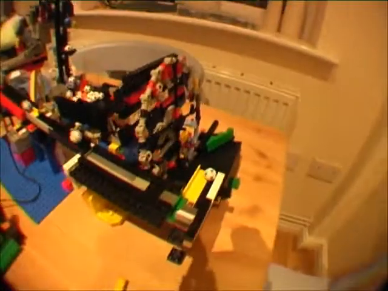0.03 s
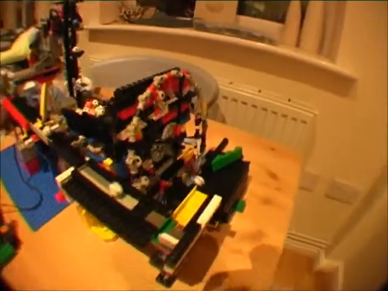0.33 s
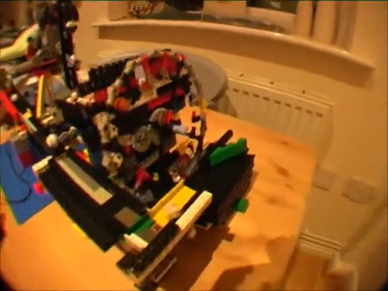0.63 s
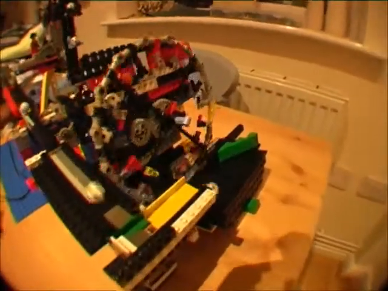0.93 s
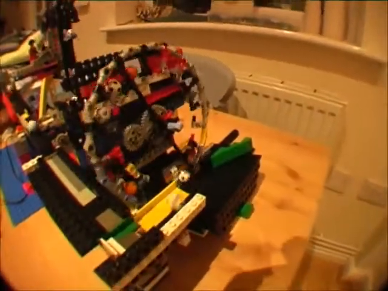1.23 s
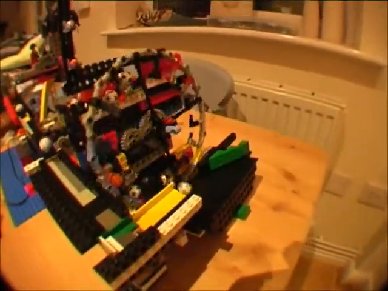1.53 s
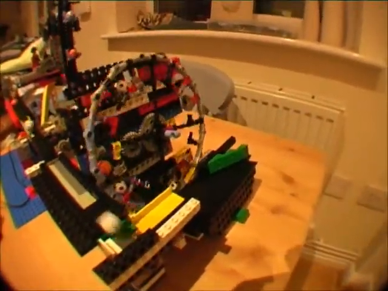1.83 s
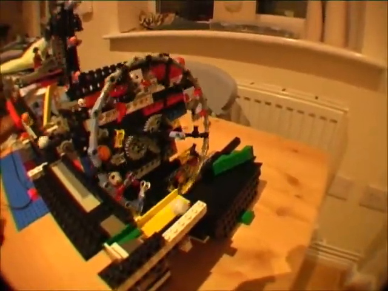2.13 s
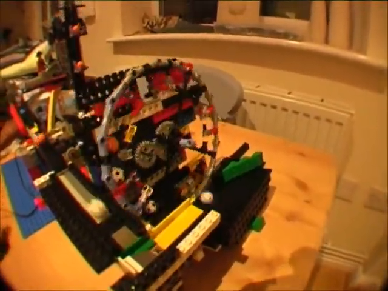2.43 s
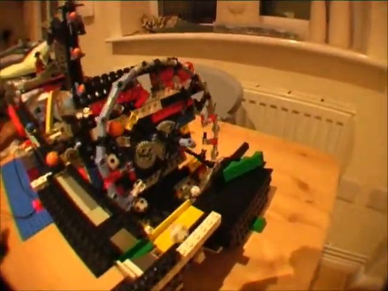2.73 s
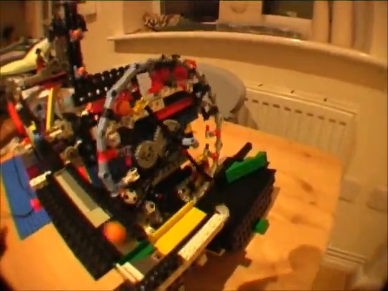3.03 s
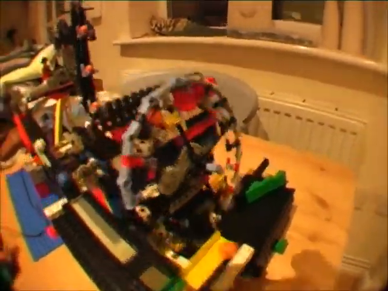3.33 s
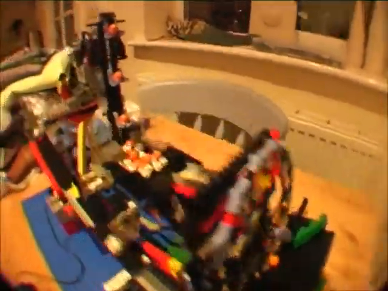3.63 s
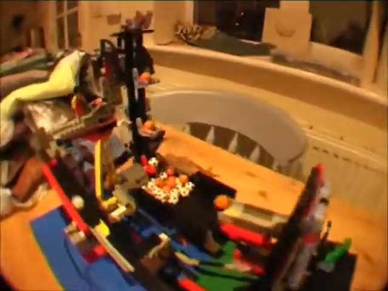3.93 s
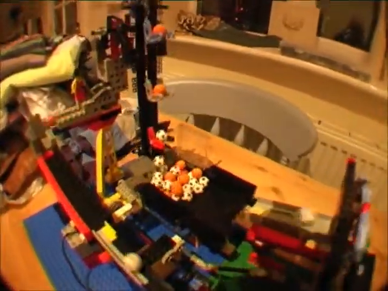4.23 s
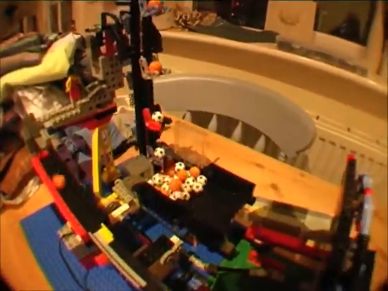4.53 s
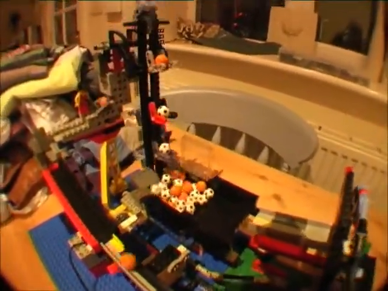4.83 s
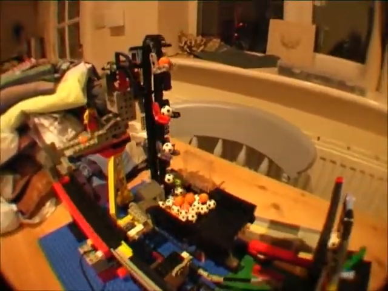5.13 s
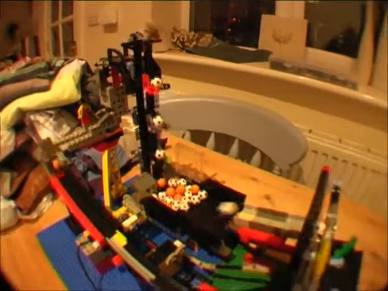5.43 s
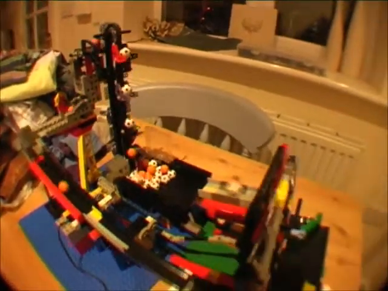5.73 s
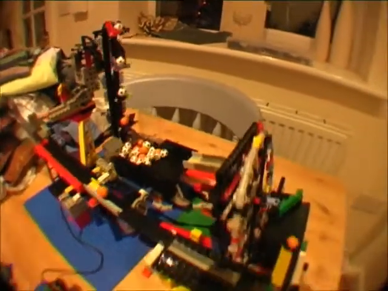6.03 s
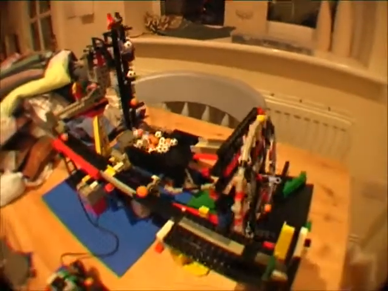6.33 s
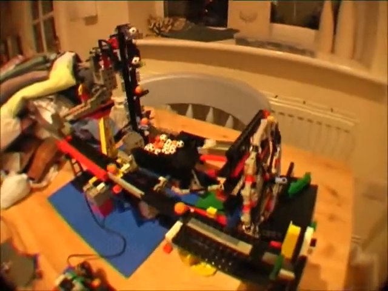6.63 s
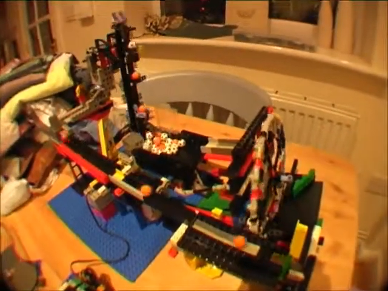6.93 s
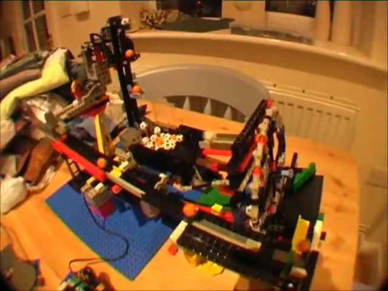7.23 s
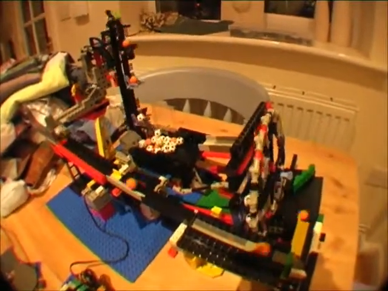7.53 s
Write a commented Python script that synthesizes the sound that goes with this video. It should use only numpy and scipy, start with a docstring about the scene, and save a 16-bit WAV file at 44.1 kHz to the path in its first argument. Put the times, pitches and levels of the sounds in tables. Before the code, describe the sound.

Small hard balls clatter and roll through a plastic brick machine, with clicking levers over a steady motor whir.

```python
"""Small hard balls clatter round a motor-driven machine of plastic bricks on a wooden table in a room.
Each impact excites damped modes: balls drop into a hollow chute, knock on brickwork, hop along ramps
and clink together, while levers snap. Rolling balls and loose parts merge many tiny contacts into a rattle.
The heavier blows thump the table, the room adds an echo and a short reverberant tail,
and the geared motor hums and whirs underneath."""
import sys
import numpy as np
from scipy import signal
from scipy.fft import rfft, irfft
from scipy.io import wavfile
from scipy.ndimage import uniform_filter1d

SR = 44100
rng = np.random.default_rng(int(sys.argv[2]) if len(sys.argv) > 2 else 0)


def transcribe(signal):
    """Save signal, clipped to [-1, 1], as a 16-bit WAV file at the path in sys.argv[1]."""
    frames = np.atleast_2d(signal).T
    limited = np.clip(frames, -1, 1)
    pcm = np.round(limited * 32767).astype(np.int16)
    wavfile.write(sys.argv[1], SR, pcm)


N = 334278
TIME = np.arange(N) / SR
RING_TIME = np.arange(int(.06 * SR)) / SR

# Balls dropping into the chute: start_s, level_db, chute_db, pan_db (always left minus right)
DROPS = [(0.2793, -19, -23, -1), (0.9941, -21, -22, 1), (1.5329, -19, -21.5, -1), (2.4125, -21, -25, -1),
         (3.1199, -18.5, -23, 0), (3.5663, -20.5, -21.5, -1.5), (4.2741, -24.5, -22.5, -5),
         (4.5968, -26.5, -25.5, -8), (5.465, -21.5, -21.5, -2), (6.1743, -23, -22.5, -5)]
# Balls falling on hollow brickwork: start_s, level_db, hardness_db, pitch_hz, thump_db, pan_db
KNOCKS = [(0.3381, -18.5, -0.5, 1590, -40, 0.5), (1.0413, -18, -6, 1640, -55, 4.5),
          (1.221, -19.5, -6, 1610, -42, 6.5), (1.8787, -15, -5, 1550, -36, 3),
          (2.1583, -17.5, -2.5, 1575, -33, 5), (2.6458, -14.5, -8, 1564, -36, 2.5),
          (3.8948, -20, -3, 1400, -37, -1), (4.0768, -11, -6.5, 1560, -26.5, -2),
          (4.5264, -13.5, -4, 1645, -35, 0), (5.5774, -14, -7, 1580, -36, 2),
          (5.9692, -14, -5, 1577, -34, 3), (6.6474, -43.5, 19, 1570, -36, 0),
          (6.8392, -14.5, -3, 1600, -44, -1.5), (7.4256, -14, -4, 1610, -33, 0)]
# Balls hopping on ramps: start_s, level_db, hardness_db, pitch_hz, pan_db
TAPS = [(0.0665, -22, -1, 1440, 6), (0.9457, -19, -2, 1880, 4), (1.082, -20, -1, 1336, 1),
        (1.363, -24.5, 1.5, 2250, 3), (1.9742, -18, -6, 1730, 2), (2.6867, -22.5, 3, 1315, 0),
        (3.6463, -20.5, -1, 2170, -1), (3.9735, -17, -4, 1620, 0), (4.0651, -23, -3, 1760, -5),
        (4.1196, -21, 4, 1390, 0.5), (4.2613, -18.5, 0, 1360, 0), (4.579, -15, 0, 1456, 2),
        (4.7477, -18.5, 2.5, 1650, 1), (4.9393, -20, 2, 2050, -1), (5.0153, -20.5, 2, 2130, 0),
        (5.0656, -21.5, 0, 1740, 0), (5.399, -21.5, -10, 1600, 1), (5.563, -22, 0, 1770, 2),
        (5.6817, -18.5, -3, 2010, 0), (5.7071, -17, 4, 1277, 2), (6.044, -20, -10, 1380, 2),
        (6.0847, -17.5, -5, 1325, 0), (6.1082, -38, -30, 1330, 1), (6.123, -29, 0, 1360, 1),
        (6.1331, -19, -12, 1320, 2), (6.399, -18.5, 2.5, 1470, 0), (6.9583, -24.5, 4, 1670, 0),
        (6.9805, -19.5, 0, 1720, 1), (7.0261, -23.5, 7, 2220, 3), (7.1581, -20.5, 6, 2010, 0),
        (7.2171, -19, 6.5, 1280, 0), (7.532, -16, -2, 1300, 0.5), (7.5732, -19.5, -3, 1420, 3)]
# Balls striking each other: start_s, level_db, upper_mode_db (relative to the lower), pan_db
CLINKS = [(0.222, -17.5, 0, 8), (0.8457, -16.5, 8, 0), (1.0328, -16, 16, 1), (1.4472, -15.5, 5, 3.5),
          (1.4583, -18.5, 6, 2), (2.0335, -15.5, 0, 5), (2.754, -19, 2, 4), (2.842, -16.5, -9, 3),
          (3.6198, -21, -9, 7), (4.4076, -12, -1, 3), (4.5149, -15.5, -6, 4), (5.1874, -15, -3, 5),
          (5.1945, -11.5, -7, -1), (5.9312, -16, -5, 7), (5.9524, -22, -12, 0.5), (6.646, -17, -1, 4),
          (6.7845, -16, 3, 1), (7.2726, -17.5, -3, 8)]
# Levers and catches striking the frame: start_s, level_db, brightness_db, pitch_hz, pan_db
SNAPS = [(0.238, -16, 1.5, 3360, -1), (0.6235, -18, -5, 4600, 2), (0.664, -23, 8, 3700, 4),
         (0.779, -21, -8, 3670, 3), (0.7852, -16, 2, 4300, 3), (0.8459, -16, -8.5, 5000, 3.5),
         (1.5157, -21, -3, 4370, 8), (1.6097, -20, 2, 7230, 8), (1.6439, -22, -1.5, 3730, 3),
         (2.213, -22, -4, 5000, 3), (2.2942, -21, -6, 4300, 4), (2.3202, -27, -3, 5870, 10),
         (2.33, -19.5, 4, 3420, 2), (2.5757, -29.5, 12.5, 7540, 4), (2.778, -21.5, -6, 4840, 4),
         (2.9062, -20, -0.5, 3310, 3), (2.9478, -22, -4, 7200, 6), (3.0466, -14.5, 1, 4300, 4),
         (3.2849, -19.5, 3, 3220, 3), (3.4046, -31.5, 15, 3580, 10), (3.5435, -14.5, -1, 3310, 2),
         (3.7572, -17, 1.5, 4450, 3), (3.8083, -18, -4.5, 3320, 2), (3.8298, -20, 6, 2490, 2),
         (3.869, -19, 7, 4380, 1), (4.191, -27, 1, 7800, 0), (4.21, -20.5, 8.5, 3320, 3),
         (4.2147, -19.5, -6, 3280, -3), (4.8115, -20, 0, 3260, -1), (4.962, -25, 13, 3340, 3),
         (5.0824, -15.5, -1, 3150, 1), (5.1706, -18, -3, 3280, 1), (5.3303, -16, 2, 3760, 2),
         (5.443, -14.5, -1, 5850, 0), (6.1092, -19.5, -2, 7040, 3), (5.296, -25, 3, 3750, 2),
         (5.8327, -24, -10, 3750, 3), (6.165, -21, -9, 4270, 1), (6.3062, -22.5, -4, 4370, 4),
         (6.3735, -20.5, 1, 4440, 5), (6.5107, -20, 4.5, 4170, -1), (7.0075, -23, 3.5, 7400, 0),
         (7.0822, -22, 8, 4630, 0), (7.0735, -21, 8, 5100, 2), (7.129, -22, -3, 4070, -0.5),
         (7.2622, -18.5, 6, 3620, 3), (7.3692, -16.5, 4, 3320, 0), (7.382, -19.5, 3, 3800, 3)]

# Band balance of each kind of impact: body_db, click_db, crack_db
DROP_BANDS_DB = [3, 2, 3]
BOUNCE_BANDS_DB = [-2, -6.5, -12.5]
KNOCK_BANDS_DB = [-10.5, 1.5, 0]
TAP_BANDS_DB = [-6.5, -3.5, -9]
SNAP_BANDS_DB = [-10, -3, -10.5]
CLINK_BANDS_DB = [-20.5, -6.5, -12]
BODY_TOP_HZ, CLICK_TOP_HZ = 2500, 6000
# Radiation spectra of the brickwork and of the small rattling parts: frequency_hz, gain_db
BRICK_SPECTRUM = [(300, -19.5), (700, -25), (1000, -10), (1300, -1.5), (1700, -2.5), (2200, -2.5),
                  (2800, -7), (3800, -3.5), (5000, -4.5), (6300, -2.5), (7500, 5), (9000, -0.5),
                  (13000, -3), (16000, -23)]
RATTLE_SPECTRUM = [(300, -21), (750, -14), (1000, -9), (1300, 3), (1700, 2.5), (2200, 1.5), (2800, -1),
                   (3800, 1), (5000, -1.5), (7500, -2.5), (9000, -8), (13000, -15), (16000, -47)]

# Continuous activity of the machine: time_s, rolling_db, rattling_db
BUSTLE = [(0, -31.5, -28), (0.97, -34.5, -31), (1.251, -32, -29.5), (1.33, -38, -35), (1.72, -30, -26.5),
          (2.43, -33, -29), (2.56, -38, -41), (2.7, -30, -29.5), (3.42, -33.5, -31), (3.49, -46, -39),
          (3.56, -32, -29), (4.6, -30.5, -29.5), (4.88, -30.5, -32.5), (5.13, -29, -32.5), (5.3, -43, -29),
          (5.36, -31.5, -28.5), (6.3, -34.5, -29.5), (7.57, -37, -27)]
# Balance of that bustle as the listener moves from the wheel to the hopper: time_s, pan_db
BUSTLE_PAN = [(0, 3.5), (2.8, 2), (4, 1), (5.3, 0), (7.5, 1)]
# Balls running down ramps: start_s, length_s, midway_level_db
ROLLS = [(0.04, .11, -27), (0.45, .08, -32), (0.77, 0.11, -27.5), (1.16, 0.064, -28), (1.59, 0.11, -29.5),
         (2.28, .14, -25.5), (3.01, 0.089, -26), (3.19, 0.048, -27.5), (3.87, .14, -25.5),
         (4.31, .07, -24.5), (4.56, .11, -27), (4.74, .05, -27), (4.93, .06, -26.5), (5.02, 0.098, -24),
         (5.88, .07, -29), (6.1, 0.11, -36), (6.405, .08, -22), (6.5, 0.063, -30), (6.95, .07, -25.5),
         (7.07, 0.1, -25.5), (7.23, .06, -27)]
# Brief chatter of loose gears and levers: start_s, length_s, level_db
CHATTERS = [(0.6, 0.1, -31.5), (0.79, .07, -41), (1.63, 0.057, -26.5), (2.92, 0.03, -23),
            (3.6, 0.036, -20.5), (3.8, .05, -20.5), (4.41, .08, -27), (4.93, 0.033, -24), (5.41, 0.16, -26),
            (5.72, 0.03, -26), (6.69, 0.073, -29.5), (6.88, 0.053, -24), (7.455, 0.015, -24.5)]
# Resonances of the ramps, and of the levers and gears: pitch_hz
RAMP_HZ = [1297, 1485, 1470, 1696, 1865, 2144]
LEVER_HZ = [3328, 3757, 4463, 5010, 5754]

# Hum of motor and gearbox before the load gain: pitch_hz, level_db, width_hz
HUM_PARTIALS = [(162.7, -65, 4.3), (332.4, -58, 19)]
# How hard the motor works: time_s, hum_gain_db
MOTOR_LOAD = [(0, 6.5), (1, 6), (3, 7), (4.3, 4), (6, 1), (7.5, 9)]
# Gear whir and room noise: frequency_hz, gain_db
WHIR_SPECTRUM = [(20, -35), (60, -3), (130, -5), (350, 0), (580, -2.5), (900, 1), (1500, 4.5), (2800, 0.5),
                 (4000, 1.5), (7500, -6.5), (15000, -19)]
# Phase between the two listening points: frequency_hz, left_lead_rad
STEREO_PHASE = [(0, 0), (260, -0.6), (780, -0.7), (2500, -0.3), (3010, -0.3), (6030, 0.0), (13700, 0.0),
                (16000, -0.1)]


def chute():
    """Inelastic rebound: a ball sounds the hollow chute and bounces twice, sooner and softer each time."""
    out = np.zeros((2, N))
    first_flight_s, second_flight_s = .061, .027
    chute_modes = part_ring(874.6, t60=.06) + from_db(-7.5) * part_ring(1077, t60=.097)
    landings, bounces = contacts(len(DROPS)), contacts(len(DROPS))
    for (start_s, level_db, chute_db, pan_db), first, second in zip(DROPS, landings, bounces):
        landing = blow(first, DROP_BANDS_DB) + from_db(-1) * part_ring(1640, t60=.094)
        bounce = blow(second, BOUNCE_BANDS_DB) + from_db(-12) * part_ring(2060, t60=.094)
        tock = from_db(chute_db) * chute_modes * panned(-1)
        gain = from_db(level_db) * panned(pan_db)
        rebound = gain * bounce + from_db(-8.5) * tock
        add(out, start_s, gain * landing + tock)
        add(out, start_s + first_flight_s, rebound)
        add(out, start_s + first_flight_s + second_flight_s, from_db(-11) * rebound)
    return out


def knocks():
    """Resonance: a falling ball draws one strong note from hollow brickwork, thickened by a nearby mode."""
    out = np.zeros((2, N))
    for (start_s, level_db, hardness_db, pitch_hz, _, pan_db), bands in zip(KNOCKS, contacts(len(KNOCKS))):
        note = part_ring(pitch_hz, t60=.027) - from_db(-6.5) * part_ring(1.3 * pitch_hz, t60=.027)
        knock = blow(bands, KNOCK_BANDS_DB, hardness_db) + from_db(-.5) * blow_one(note)
        add(out, start_s, from_db(level_db) * knock * panned(pan_db))
    return out


def taps():
    """Impulse response: a hopping ball sounds the natural frequency of the ramp under it."""
    out = np.zeros((2, N))
    for (start_s, level_db, hardness_db, pitch_hz, pan_db), bands in zip(TAPS, contacts(len(TAPS))):
        tap = blow(bands, TAP_BANDS_DB, hardness_db) + from_db(-2.5) * part_ring(pitch_hz, t60=.05)
        add(out, start_s, from_db(level_db) * tap * panned(pan_db))
    return out


def clinks():
    """Hard collision: ball meets ball with hardly any body, and a pair of high modes pings."""
    out = np.zeros((2, N))
    lower, upper = part_ring(3703, t60=.033), part_ring(5040, t60=.033)
    for (start_s, level_db, upper_mode_db, pan_db), bands in zip(CLINKS, contacts(len(CLINKS))):
        ping = blow_one(lower + from_db(upper_mode_db) * upper)
        clink = blow(bands, CLINK_BANDS_DB) + from_db(-3) * ping
        add(out, start_s, from_db(level_db) * clink * panned(pan_db))
    return out


def snaps():
    """Free vibration: a lever strikes the frame and rings briefly; brightness trades body for crack."""
    out = np.zeros((2, N))
    for (start_s, level_db, brightness_db, pitch_hz, pan_db), bands in zip(SNAPS, contacts(len(SNAPS))):
        click = from_db(-brightness_db) * blow(bands, SNAP_BANDS_DB, 2 * brightness_db)
        ring = from_db(-6) * part_ring(pitch_hz, t60=.042)
        add(out, start_s, from_db(level_db) * (click + ring) * panned(pan_db))
    return out


def contacts(count):
    """Damping rises with frequency: each impact has a woody body, a shorter click and a brief crack."""
    body = crowded_modes(BRICK_SPECTRUM, t60=.017, snap_db=2, tail_db=-11, side_db=-16, count=count)
    click = crowded_modes(BRICK_SPECTRUM, t60=.015, snap_db=0, tail_db=-12, side_db=-15, count=count)
    crack = crowded_modes(BRICK_SPECTRUM, t60=.012, snap_db=4, tail_db=-10, side_db=-16, count=count)
    body = cut(body, BODY_TOP_HZ, "low")
    click = cut(click, [BODY_TOP_HZ, CLICK_TOP_HZ], "band")
    crack = cut(crack, CLICK_TOP_HZ, "high")
    return [[blow_one(band) for band in bands] for bands in zip(body, click, crack)]


def blow(bands, bands_db, hardness_db=0):
    """Contact stiffness: a harder impact lifts the crack, and the click by half as many decibels."""
    return sum(from_db(band_db + share * hardness_db) * band
               for band, band_db, share in zip(bands, bands_db, (0, .5, 1)))


def crowded_modes(spectrum, t60, snap_db, tail_db, side_db, count):
    """Modal overlap: a brick's modes blur into noise with a snap, a fast decay and the frame's tail."""
    decay = from_db(snap_db) * fade(.0025) + fade(t60) + from_db(tail_db) * fade(.05)
    return colour(stereo_noise((count, len(RING_TIME)), side_db) * decay, spectrum)


def part_ring(hz, t60):
    """Radiation efficiency: a small ringing part radiates poorly below its own note."""
    return blow_one(cut(mode(hz, t60), .6 * hz, "high", order=2))


def table():
    """Structure-borne sound: the table top answers a blow with a damped thump and a slow sway."""
    out = np.zeros((2, N))
    thump = blow_one(mode(170, t60=.025) + from_db(6) * mode(340, t60=.015))
    sway = blow_one(mode(38.5, t60=.059))
    # start_s, level_db, sway_db; a drop rocks the table more
    blows = [(start_s, thump_db, -7.5) for start_s, _, _, _, thump_db, _ in KNOCKS]
    blows += [(start_s, level_db - 32, 8.5) for start_s, level_db, *_ in DROPS]
    blows += [(start_s, level_db - 27.5, -7.5) for start_s, level_db, *_ in CLINKS]
    for start_s, level_db, sway_db in blows:
        add(out, start_s, from_db(level_db - .5) * (thump + from_db(sway_db) * sway))
    return out


def bustle():
    """Roughness excitation: balls roll over studs and seams, while gears and levers chatter higher up."""
    time_s, rolling_db, rattling_db = np.transpose(BUSTLE)
    runs = swells(ROLLS, gain_db_per_s=9)   # a ball grows louder as it gathers speed
    treble_bursts = np.hypot(swells(CHATTERS), from_db(-3) * runs)
    rolling_gain = np.hypot(from_db(np.interp(TIME, time_s, rolling_db)), runs)
    rattling_gain = np.hypot(from_db(np.interp(TIME, time_s, rattling_db)), treble_bursts)
    speed = rolling_gain / rolling_gain.mean()   # faster balls cross more seams
    rolling = rattle(RAMP_HZ, ring_db=-5, per_s=460 * speed ** 1.7)
    levers = rattle(LEVER_HZ, ring_db=-4.5, per_s=320 * speed ** .7)
    low = cut(levers + from_db(1) * rolling, BODY_TOP_HZ, "low")
    low = cut(low, 169, "high", order=2)   # small parts radiate no bass
    high = cut(levers + from_db(-7.5) * rolling, BODY_TOP_HZ, "high")
    return rolling_gain * evened(low, .04) + rattling_gain * evened(high, .1)


def rattle(rings_hz, ring_db, per_s, spread_db=4.5, count=180):
    """Shot noise: random small contacts of uneven strength, each on a part of its own size and place."""
    out = np.zeros((2, N))
    parts = crowded_modes(RATTLE_SPECTRUM, t60=.023, snap_db=-1, tail_db=-16, side_db=-13, count=count)
    slots = 12000
    for when, chance, size, which, detune, place in rng.random((slots, 6)):
        if chance < per_s[int(when * N)] * N / SR / slots:
            part = int(which * count)
            pitch_hz = rings_hz[part % len(rings_hz)] * (1 + .08 * (detune - .5))
            contact = blow_one(parts[part]) + from_db(ring_db) * blow_one(mode(pitch_hz, t60=.03))
            strength = from_db(spread_db * min(-np.log(1 - size), 3.2))
            add(out, when * N / SR, strength * contact * panned(6 * (place - .5)))
    return out


def swells(rows, gain_db_per_s=0, attack_s=.014, release_s=.02):
    """Incoherent sources add in power: the joint envelope of sounds that set in, last and die away."""
    t, power = TIME[::40], 0
    for start_s, length_s, level_db in rows:
        age = t - start_s
        gate = np.clip(age / attack_s, 0, 1) * np.exp(-np.maximum(age - length_s, 0) / release_s)
        growth_db = gain_db_per_s * (np.clip(age, 0, length_s) - length_s / 2)
        power = power + (gate * from_db(level_db + growth_db)) ** 2
    return np.interp(TIME, t, np.sqrt(power))


def motor():
    """Narrowband noise: the motor's hum wavers and follows its load, over the steady whir of the gears."""
    hum = 0
    for pitch_hz, level_db, width_hz in HUM_PARTIALS:
        pole = np.exp(-2 * np.pi * width_hz / SR)
        noise = rng.standard_normal(N) + 1j * rng.standard_normal(N)
        waver = signal.lfilter([1], [1, -2 * pole, pole * pole], noise)
        hum = hum + from_db(level_db) * rms_one(np.real(waver * np.exp(2j * np.pi * pitch_hz * TIME)))
    whir = from_db(-36) * rms_one(colour(stereo_noise((N,), side_db=-13), WHIR_SPECTRUM))
    load_gain = from_db(np.interp(TIME, *np.transpose(MOTOR_LOAD)))
    return whir + hum * load_gain * panned(-1.4)


def room(x, echo_s, echo_db, tail_db, t60):
    """Reflection: a near wall returns one dull echo, and the furnished room adds a short diffuse tail."""
    t = np.arange(SR // 2) / SR
    tail = cut(rng.standard_normal((2, len(t))), 4700, "low", order=1)
    tail = tail * from_db(-60 * t / t60) * (t > echo_s)
    tail = from_db(tail_db) * tail / np.sqrt(np.sum(tail ** 2) / 2)
    echo = np.zeros((2, N))
    add(echo, echo_s, from_db(echo_db) * cut(x, 2300, "low", order=1))
    return x + echo + signal.fftconvolve(x, tail, axes=-1)[:, :N]


def mode(hz, t60):
    """Damped harmonic oscillator."""
    return np.sin(2 * np.pi * hz * RING_TIME) * fade(t60)


def fade(t60):
    """Exponential decay by 60 dB in t60 seconds."""
    return from_db(-60 * RING_TIME / t60)


def stereo_noise(shape, side_db):
    """Partial coherence: noise mostly common to both ears; channels are the last axis but one."""
    mid, side = rng.standard_normal((2,) + shape)
    return np.stack([mid + from_db(side_db) * side, mid - from_db(side_db) * side], axis=-2)


def colour(x, spectrum, size=4096):
    """Minimum-phase filter through the points of a spectrum."""
    hz, level_db = np.transpose(spectrum)
    bins_hz = np.arange(size // 2 + 1) * SR / size
    gain = from_db(np.interp(np.log(bins_hz + 1), np.log(hz), level_db))
    cepstrum = irfft(np.log(gain))
    cepstrum[1:size // 2] *= 2   # folding onto positive time makes the response causal
    cepstrum[size // 2 + 1:] = 0
    response = irfft(np.exp(rfft(cepstrum)))[:size // 2]
    response = response.reshape((1,) * (x.ndim - 1) + (-1,))
    return signal.fftconvolve(x, response, axes=-1)[..., :x.shape[-1]]


def cut(x, hz, kind, order=4):
    return signal.sosfilt(signal.butter(order, hz, kind, fs=SR, output="sos"), x)


def evened(x, seconds):
    """Division by the running rms holds the slow level at 1 and keeps the single contacts."""
    power, width = np.mean(x ** 2, axis=0), int(seconds * SR)
    return x / np.sqrt(uniform_filter1d(uniform_filter1d(power, width), width) + 1e-9)


def blow_one(x):
    """Normalisation of a blow to rms 1 over its first 10 ms."""
    return x / np.sqrt(np.mean(x[..., :SR // 100] ** 2) + 1e-20)


def rms_one(x):
    return x / np.sqrt(np.mean(x ** 2) + 1e-20)


def panned(pan_db):
    """Interaural level difference: left and right gains, pan_db apart."""
    return from_db(pan_db * np.array([[.5], [-.5]]))


def from_db(db):
    return 10 ** (np.asarray(db) / 20)


def add(track, start_s, sound):
    start = int(start_s * SR)
    track[:, start:start + sound.shape[-1]] += sound[..., :max(N - start, 0)]


def scene():
    """Superposition: the clattering machine in its room, over the hum of its motor."""
    impacts = chute() + knocks() + taps() + clinks() + snaps() + table()
    machine = impacts + bustle() * panned(np.interp(TIME, *np.transpose(BUSTLE_PAN)))
    return room(machine, echo_s=.0087, echo_db=-18, tail_db=-17.5, t60=.82) + motor()


def record(dry):
    """Two closely spaced pickup points differ in midrange phase; peaks saturate and the top is cut off."""
    ceiling, cutoff_hz = 1.05, 16400
    hz = np.arange(N // 2 + 1) * SR / N
    left_lead_rad = np.interp(hz, *np.transpose(STEREO_PHASE))
    shifted = irfft(rfft(dry) * np.exp(.5j * left_lead_rad * [[1], [-1]]), N)
    limited = shifted / (1 + np.abs(shifted / ceiling) ** 6) ** (1 / 6)
    return signal.sosfilt(signal.ellip(10, .2, 70, cutoff_hz, fs=SR, output="sos"), limited)


dry = scene()
out = record(dry)
transcribe(out)
```